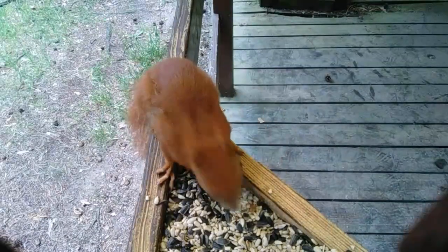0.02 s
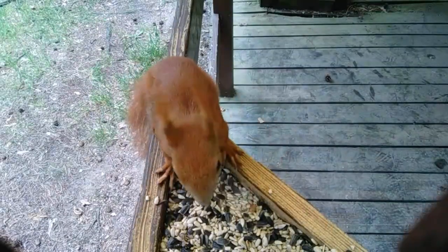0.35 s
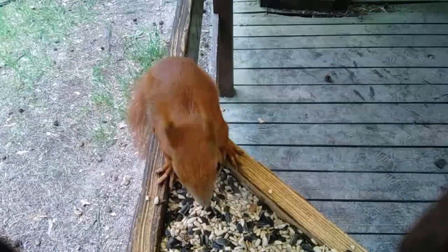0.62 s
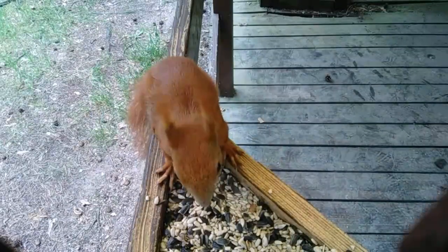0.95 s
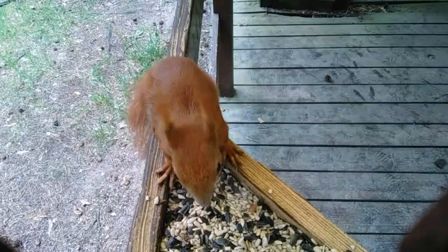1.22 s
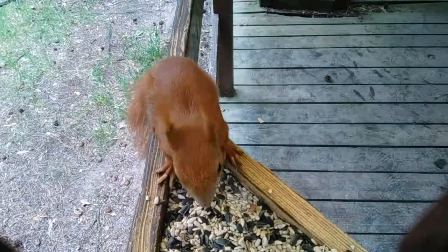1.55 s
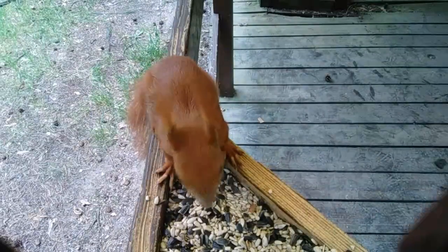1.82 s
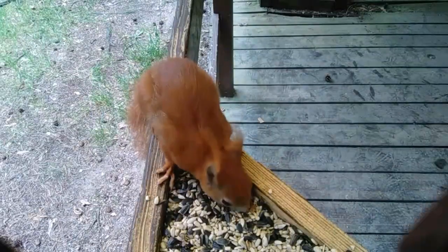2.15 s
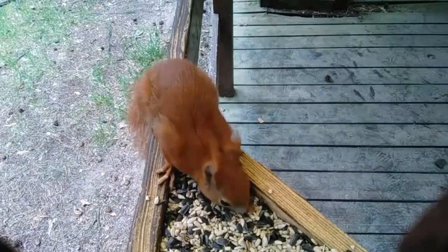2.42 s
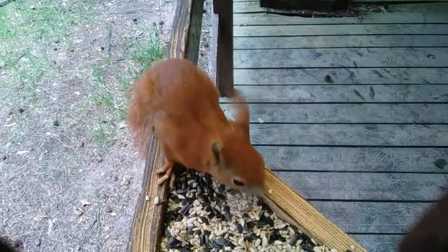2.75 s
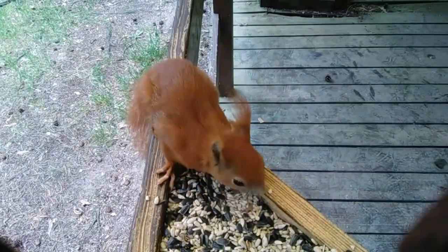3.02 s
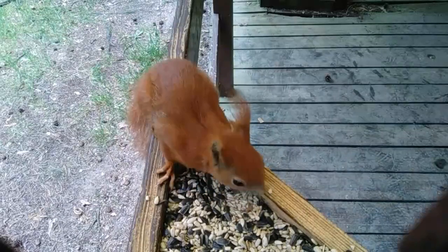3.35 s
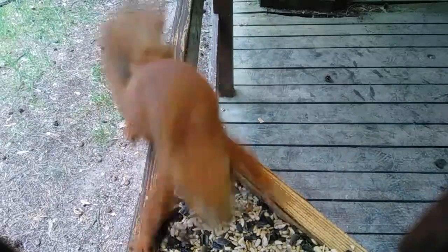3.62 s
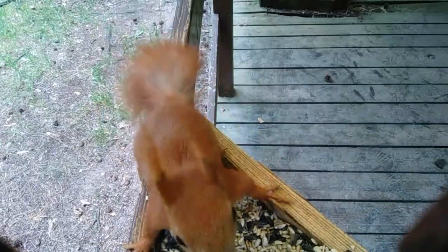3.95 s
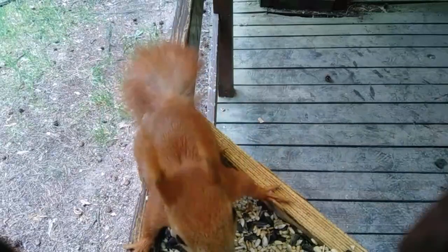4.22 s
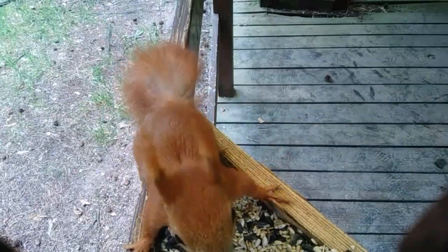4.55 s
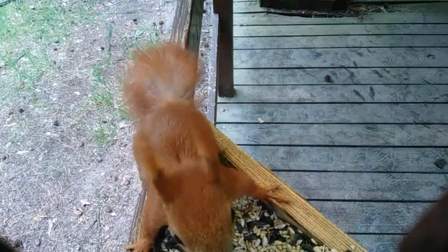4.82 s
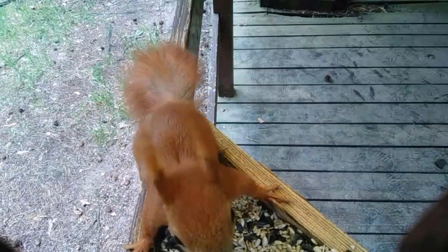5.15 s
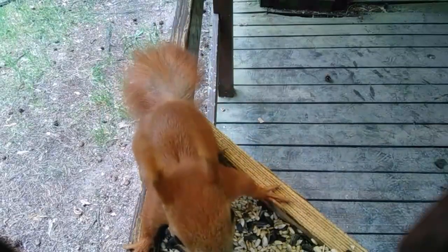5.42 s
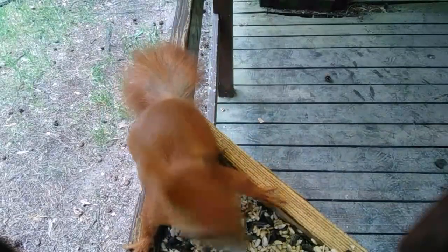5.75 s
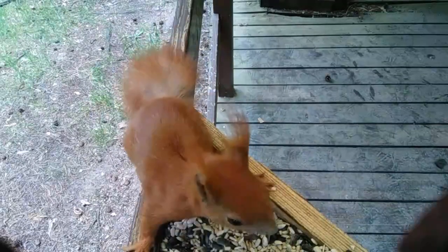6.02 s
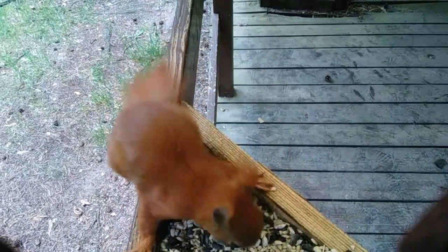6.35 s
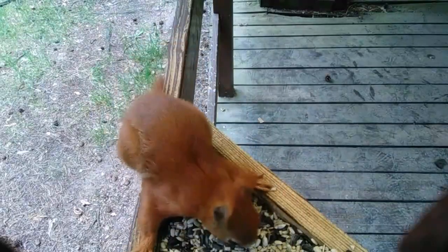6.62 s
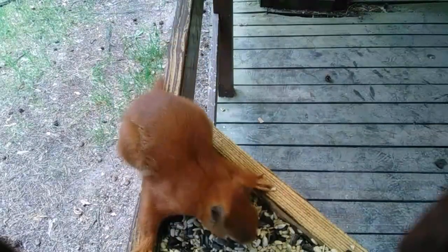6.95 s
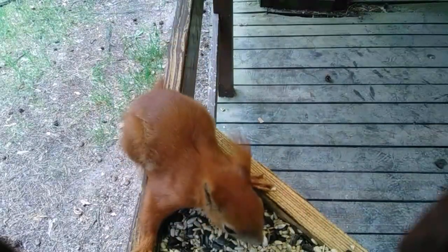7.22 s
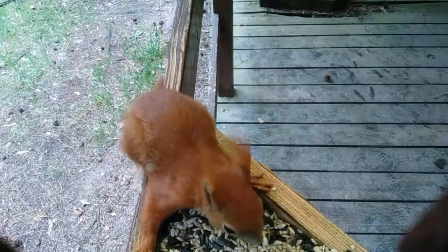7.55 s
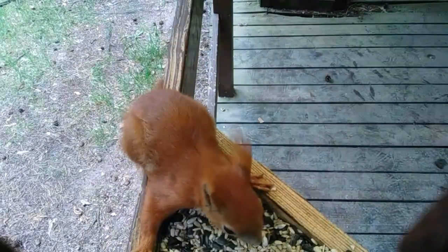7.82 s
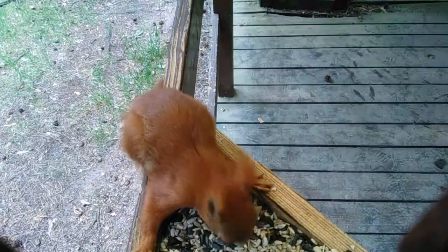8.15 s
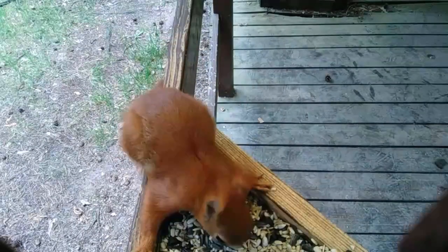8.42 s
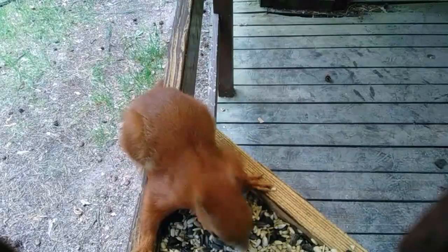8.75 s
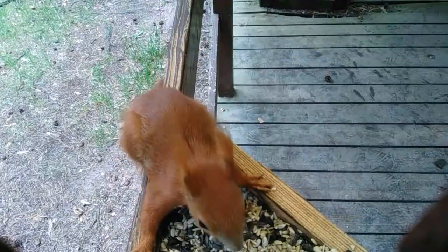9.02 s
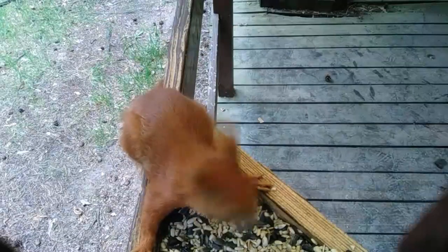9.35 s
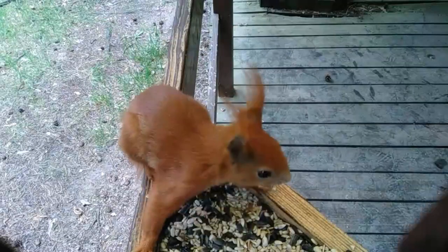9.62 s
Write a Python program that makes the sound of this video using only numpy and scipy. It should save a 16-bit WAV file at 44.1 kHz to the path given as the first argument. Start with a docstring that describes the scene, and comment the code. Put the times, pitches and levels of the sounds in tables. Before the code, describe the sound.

A squirrel feeds from a wooden seed tray on a porch, close to the microphone. Husks break with short, bright snaps, loose seeds tick and rustle, and paws knock on the boards. Two louder flurries of cracks, hollow thumps and shuffling come about a third of the way in and just past the middle. Lighter clicks and taps follow, over faint outdoor hiss and low rumble.

```python
"""Seed husks crack between a squirrel's teeth as it feeds from a wooden tray on a porch.
Each husk fails by brittle fracture: a run of tiny breaks gives a bright snap over a hollow body.
Paws knock and shuffle on the boards and excite their modes, while loose seeds tick and rustle.
The porch adds a short tail to cracks and knocks; faint outdoor air and a low rumble lie underneath.
The housing of a small camera close by colours most of these sounds with its resonances."""
import sys
import numpy as np
from scipy import signal
from scipy.fft import rfft, irfft
from scipy.io import wavfile
from scipy.ndimage import uniform_filter1d

SR = 44100
rng = np.random.default_rng(int(sys.argv[2]) if len(sys.argv) > 2 else 0)


def materialize(psi):
    """Save the field psi as 16-bit PCM at rate SR to the path in sys.argv[1].

    A 1-D psi becomes a single channel; in a 2-D psi each row is a channel.
    """
    bounded = np.clip(np.atleast_2d(psi).T, -1, 1)
    quanta = np.round(bounded * 32767).astype(np.int16)
    wavfile.write(sys.argv[1], SR, quanta)


N = 435708
TIME_S = np.arange(N) / SR
HIT_TIME_S = np.arange(SR // 2) / SR
FREQ_HZ = np.maximum(np.fft.rfftfreq(8192, 1 / SR), 1)
LEAD_S = 0.02  # room for the build-up ahead of each hit

# Resonances of the camera housing: centre_hz, width_hz, gain_db
HOUSING_PEAKS = [(372, 347, 7), (835, 217, 11.5), (1590, 200, 7), (2090, 56, 6), (2800, 32, 5.5),
                 (4040, 1100, 4.5), (5970, 2500, 2), (8250, 1900, 6.5), (9100, 61, 0)]
# Spectrum of the outdoor hiss: frequency_hz, gain_db
AIR_SPECTRUM = [(40, -4.5), (100, -3.5), (160, -12), (390, -7.5), (560, -14.5), (860, -11.5), (1050, -10.5),
                (1620, -9.5), (2300, -14), (3800, -17.5), (4900, -22), (8600, -16.5), (15500, -24.5)]
# Course of the outdoor air, before its trims: time_s, hiss_db, rumble_db
AIR_LEVELS = [(0.0, -60.5, -75), (1.35, -62.5, -69.5), (5.45, -65.5, -79.5), (5.89, -63, -69),
              (6.6, -66, -74), (9.88, -66.5, -81)]
# Nose and claws brushing through the seeds: start_s, level_db, centre_hz, length_s
SEED_BRUSHES = [(1.158, -65.5, 1620, 0.017), (1.262, -73.5, 2450, 0.14), (1.412, -62.5, 1550, 0.031),
                (1.587, -66, 730, 0.058), (1.752, -69, 2200, 0.088), (1.893, -66.5, 1730, 0.12),
                (2.043, -66.5, 495, .088), (3.058, -64, 820, 0.031), (3.121, -60.5, 920, 0.048),
                (4.802, -66, 1050, 0.026), (5.635, -65, 1510, 0.088), (5.769, -68, 1490, 0.16),
                (7.012, -72.5, 7100, .06), (7.098, -65, 1180, 0.033), (7.296, -73.5, 1620, 0.1),
                (7.653, -63.5, 1230, 0.086), (7.869, -70.5, 6840, 0.12), (8.059, -66, 1830, 0.051),
                (9.259, -71.5, 2080, 0.075), (9.412, -72, 1660, 0.036)]
# Modes of the tray's boards: pitch_hz, relative_db, t60_s
BOARD_MODES = [(114, 0, 0.24), (178.8, 8.5, 0.14), (256, -1.5, 0.075), (347, -19, 0.066), (414.7, 7, 0.092),
               (495, -29, 0.13), (618, -5, 0.16), (697, 3, 0.078), (800, -27, 0.072), (848, -2.5, 0.048),
               (1118, 9.5, 0.069), (1410, 2, .09), (1490, -6, 0.15)]
# Spectrum of soft paw contact: frequency_hz, gain_db
PAD_SPECTRUM = [(40, -105), (80, -26.5), (118, -2.5), (175, 2), (260, -2), (500, -15.5), (800, -18.5),
                (1500, -38), (3000, -39), (8000, -53)]
# Paws pushing on the rim as the weight shifts: start_s, level_db, hold_s
PAW_PUSHES = [(2.83, -48.5, 0.089), (2.98, -52.5, 0.011), (3.105, -54, 0.038), (3.629, -34.5, 0.011),
              (3.74, -60, .07), (4.11, -52.5, 0.034), (5.50, -60.5, 0.063), (5.58, -50, 0.064),
              (5.735, -45, 0.12), (5.99, -40.5, 0.037), (6.13, -56.5, 0.2)]
# The tray rocking under the animal: start_s, level_db, length_s
TRAY_SWAYS = [(2.894, -59, 0.081), (5.722, -45.5, 0.04), (5.808, -50.5, 0.13), (6.331, -50.5, .025),
              (7.593, -59, 0.07), (7.734, -60.5, 0.028)]
# Paws and seeds striking the tray: impact_s, level_db, pitch_hz, rattle_s
TRAY_KNOCKS = [(0.096, -61, 504, 0.016), (.793, -63.5, 348, 0.012), (0.987, -58.5, 430, 0.041),
               (1.2175, -33.5, 517, 0.00061), (1.386, -57, 686, .013), (1.438, -63, 440, .004),
               (1.782, -55.5, 390, 0.011), (1.87, -54.5, 393, 0.015), (2.284, -56.5, 360, 0.016),
               (2.4215, -35, 380, 0.0023), (2.851, -35.5, 207, 0.018), (3.217, -50, 253, 0.0067),
               (3.52, -38, 430, 0.019), (3.598, -32.5, 335, .013), (3.617, -31, 185, 0.014),
               (3.707, -44.5, 220, 0.01), (3.796, -46.5, 198, 0.0056), (3.886, -59.5, 640, 0.02),
               (3.978, -59.5, 530, .005), (4.106, -45.5, 221, 0.0086), (4.154, -46, 330, 0.0047),
               (4.416, -57, 380, 0.025), (5.088, -62, 292, 0.0033), (5.207, -60, 323, 0.02),
               (5.570, -39.5, 370, 0.032), (5.985, -35.5, 250, 0.025), (6.04, -43.5, 334, 0.019),
               (6.230, -35.5, 980, 0.011), (6.236, -27.5, 303, 0.015), (6.342, -45.5, 308, .001),
               (6.75, -58.5, 396, 0.0023), (7.633, -58.5, 476, .0056), (8.082, -57.5, 760, .025),
               (8.4437, -41.5, 370, 0.0089), (8.85, -59.5, 555, 0.0047), (9.075, -52.5, 398, 0.0058),
               (9.223, -49.5, 606, 0.016), (9.743, -65, 330, 0.015)]
# Spectrum of a hollow husk: frequency_hz, gain_db
HUSK_SPECTRUM = [(600, -27.5), (950, -10.5), (1200, -2), (1600, -3.5), (2200, -1), (3000, -4),
                 (4000, -17.5), (6000, -29.5), (12000, -39)]
# Resonances of the husk's cavity: centre_hz, width_hz, gain_db
CAVITY_PEAKS = [(1550, 1350, 5), (2400, 320, -1.5), (4330, 500, 7)]
# Husks breaking: split_s, snap_db, pitch_hz, body_db, tear_s
HUSK_CRACKS = [(0.4, -62.5, 6600, -62.5, 0.015), (1.218, -67, 7000, -56.5, .003),
               (1.287, -63.5, 11500, -72, .004), (1.369, -39, 8430, -53, 0.016),
               (1.65, -70, 7950, -75, 0.0011), (2.538, -48.5, 11600, -66, .0018),
               (2.546, -56, 10000, -57, 0.0087), (2.827, -66.5, 7560, -89, .005),
               (2.998, -67, 8760, -71, .005), (3.099, -65.5, 7350, -79, 0.0033),
               (3.191, -66.5, 9700, -81, .005), (3.512, -38, 8800, -55, 0.0052),
               (3.520, -32.5, 8100, -38, 0.004), (3.547, -45.5, 8450, -56, 0.0025),
               (3.570, -69, 8000, -53, .002), (3.588, -43.5, 8200, -50.5, 0.017),
               (3.710, -46.5, 9240, -66, 0.0037), (3.790, -58, 8840, -63, 0.005),
               (4.157, -41, 9040, -56.5, 0.013), (4.919, -47.5, 9200, -76, .005),
               (5.55, -60, 12000, -54, 0.0099), (5.577, -56, 8100, -61.5, 0.0091),
               (5.615, -56, 12500, -64.5, 0.0022), (5.9518, -32, 8000, -32, 0.024),
               (6.311, -57.5, 8430, -80, .004), (6.353, -60.5, 8250, -72, 0.004),
               (6.723, -74, 7000, -59, 0.0017), (7.108, -70, 9000, -72, 0.0032),
               (7.365, -66, 8700, -63, .001), (7.607, -62, 12100, -87, .002),
               (7.635, -56.5, 7500, -63, 0.0022), (8.486, -44.5, 10350, -77, .003),
               (8.852, -52.5, 7740, -61.5, 0.0012), (9.220, -50.5, 9400, -55, 0.0014)]


def amp(db):
    """Amplitude grows tenfold for every 20 dB."""
    return 10 ** (np.asarray(db) / 20)


def unit_rms(x):
    """Normalisation to unit mean power."""
    return x / np.sqrt(np.mean(x ** 2))


def at_level(x, db):
    """Energy normalisation: the hit has this level when its energy is spread over 20 ms."""
    return x * amp(db) / np.sqrt(np.sum(x ** 2) * 50 / SR)


def add(out, start_s, x):
    """Superposition: x joins the mix from start_s on."""
    start = max(int(start_s * SR), 0)
    out[start:start + len(x)] += x[:N - start]


def spectrum(points):
    """A spectral envelope, interpolated in decibels over log frequency."""
    hz, db = np.transpose(points)
    return amp(np.interp(np.log(FREQ_HZ), np.log(hz), db))


def band(hz, octaves):
    """A band-pass response with long skirts, symmetric in log frequency."""
    return (1 + (np.log2(FREQ_HZ / hz) / octaves) ** 2 / 2) ** -2


def resonances(peaks):
    """Resonances in series: their bell-shaped curves add in decibels."""
    return amp(sum(db / (1 + (2 * (FREQ_HZ - hz) / width_hz) ** 2) for hz, width_hz, db in peaks))


def colour(x, gain):
    """Minimum-phase filtering: folding the cepstrum makes the response causal."""
    cepstrum = irfft(np.log(np.maximum(gain, 1e-6)))
    cepstrum[1:len(FREQ_HZ) - 1] *= 2
    cepstrum[len(FREQ_HZ):] = 0
    response = irfft(np.exp(rfft(cepstrum)))
    return signal.fftconvolve(x, response)[:len(x)]


def decay(t60_s):
    """Exponential damping, 60 dB in t60_s."""
    return np.exp(-np.log(1000) * HIT_TIME_S / t60_s)


def strain(rise_s, fall_s, hold_s=0):
    """Strain grows exponentially up to the moment of a hit, holds and relaxes."""
    t = HIT_TIME_S - LEAD_S
    return np.exp(np.minimum(np.minimum(t / rise_s, (hold_s - t) / fall_s), 0))


def drift(rate_hz):
    """Slow random modulation with a spread near 1."""
    knots = rng.standard_normal(int(N / SR * rate_hz) + 2)
    return np.interp(TIME_S * rate_hz, np.arange(len(knots)), knots)


def grains(size, per_s, spread_db):
    """A Poisson train of tiny impacts of uneven strength and either sign."""
    occurs = rng.random(size) < per_s / SR
    strength = amp(spread_db * np.clip(rng.standard_normal(size), -2, 2))
    return occurs * rng.choice([-1, 1], size) * strength


def porch(x, wet_db, t60_s):
    """Diffuse reverberation: reflections from boards and wall form noise that trails the impacts."""
    tail = (decay(t60_s) * (1 - np.exp(-HIT_TIME_S / 0.001))) ** 2
    energy = np.abs(signal.fftconvolve(x ** 2, tail / tail.sum())[:len(x)])
    return x + amp(wet_db) * np.sqrt(energy) * rng.standard_normal(len(x))


def boards(force, ring_db):
    """Modal response: a contact is heard together with the damped modes that it excites."""
    ring = sum(amp(db) * np.cos(2 * np.pi * hz * HIT_TIME_S) * decay(t60_s)
               for hz, db, t60_s in BOARD_MODES)
    return force + amp(ring_db) * signal.fftconvolve(force, ring)[:len(force)]


def outdoor_air():
    """Ambient noise: a smooth distant hiss, and a narrow-band rumble that swells twice and dies down."""
    hiss_trim_db, rumble_trim_db = -2, 3
    time_s, hiss_db, rumble_db = np.transpose(AIR_LEVELS)
    hiss = unit_rms(colour(rng.standard_normal(N), spectrum(AIR_SPECTRUM) * resonances(HOUSING_PEAKS)))
    low_bands = band(hz=47.5, octaves=0.22) + amp(-20.5) * band(hz=27.3, octaves=0.27)
    rumble = unit_rms(colour(rng.standard_normal(N), low_bands))
    hiss_gain = amp(hiss_trim_db + np.interp(TIME_S, time_s, hiss_db) + 0.35 * drift(rate_hz=1.405))
    rumble_gain = amp(rumble_trim_db + np.interp(TIME_S, time_s, rumble_db))
    return hiss * hiss_gain + rumble * rumble_gain


def seeds():
    """Granular noise: brushed seeds slide in tiny collisions over constant faint nibbling and rustle."""
    out = np.zeros(N)
    for start_s, level_db, centre_hz, length_s in SEED_BRUSHES:
        size = int(length_s * SR)
        slide = colour(grains(size, per_s=2000, spread_db=2.5), band(centre_hz, octaves=0.54))
        add(out, start_s, amp(level_db) * unit_rms(slide * np.hanning(size)))
    bites = grains(N, per_s=16, spread_db=3.2)
    crumble_energy = signal.fftconvolve(bites ** 2, decay(t60_s=0.033) ** 2)[:N]
    nibbles = np.sqrt(np.abs(crumble_energy)) * rng.standard_normal(N)
    ticks = colour(nibbles, band(hz=9000, octaves=0.7) * resonances(HOUSING_PEAKS))
    rustle = colour(grains(N, per_s=900, spread_db=3), spectrum(HUSK_SPECTRUM))
    rustle *= amp(2.5 * drift(rate_hz=14))
    return out + amp(-79) * unit_rms(ticks) + amp(-78.5) * unit_rms(rustle)


def tray_rocking():
    """Low-frequency vibration: the tray sways under the animal in brief swells of deep noise."""
    out = np.zeros(N)
    for start_s, level_db, length_s in TRAY_SWAYS:
        size = int(length_s * SR)
        sway = colour(rng.standard_normal(size), band(hz=45, octaves=1.0))
        add(out, start_s, amp(level_db) * unit_rms(sway * np.hanning(size)))
    return out


def paw_shuffles():
    """Forced vibration: many soft pushes drive the boards as paws grip, hold and let go of the rim."""
    grip_s, release_s = 0.019, 0.045  # time constants
    pad_gain = spectrum(PAD_SPECTRUM) * resonances(HOUSING_PEAKS)
    pushes = colour(grains(N, per_s=500, spread_db=-0.5), pad_gain)
    rubbing = boards(pushes, ring_db=-47)
    # Even strength, so that the animal's weight sets the level.
    rubbing /= np.sqrt(uniform_filter1d(rubbing ** 2, size=1500) + 1e-18)
    out = np.zeros(N)
    for start_s, level_db, hold_s in PAW_PUSHES:
        grip = (TIME_S - start_s) / grip_s
        release = (start_s + hold_s - TIME_S) / release_s
        out += rubbing * amp(level_db) * np.exp(np.clip(np.minimum(grip, release), -20, 0))
    return out


def tray_knocks():
    """Impact excitation: harder contacts excite a wider band; claws and seeds rattle round each blow."""
    medium_db, medium_octaves, octaves_per_db = -45, 1.07, 0.1081
    out, housing = np.zeros(N), resonances(HOUSING_PEAKS)
    for impact_s, level_db, pitch_hz, rattle_s in TRAY_KNOCKS:
        edge_ratio = 2 ** ((medium_octaves + octaves_per_db * (level_db - medium_db)) / 2)
        highpass_hz, lowpass_hz = pitch_hz / edge_ratio, pitch_hz * edge_ratio
        contact = ((1 + (highpass_hz / FREQ_HZ) ** 7) * (1 + (FREQ_HZ / lowpass_hz) ** 12)) ** -0.5
        rattle = strain(rise_s=0.35 * rattle_s, fall_s=rattle_s)  # claws touch down ahead of the blow
        force = amp(-10) * grains(len(HIT_TIME_S), per_s=4000, spread_db=4) * rattle
        force[int(LEAD_S * SR)] = 1  # the blow
        force[int((LEAD_S + 0.003) * SR)] -= amp(-11.5)  # it returns inverted from the tray's far end
        push = colour(porch(force, wet_db=-9.5, t60_s=0.17), contact * housing)
        add(out, impact_s - LEAD_S, at_level(boards(push, ring_db=-52), level_db))
    return out


def husk_resonances(depth_db):
    """Irregular resonance: each husk has its own random peaks and dips."""
    knots_hz = np.linspace(0, SR / 2, num=170)
    return amp(depth_db * np.interp(FREQ_HZ, knots_hz, rng.standard_normal(len(knots_hz))))


def husk_cracks():
    """Brittle fracture: a run of tiny breaks gives a bright snap and excites the husk's hollow body."""
    clean_octaves, crush_octaves = 0.33, 0.47  # crushing the whole seed broadens the snap
    splinters = amp(-17) * band(hz=14700, octaves=0.091)  # the finest pieces fizz at the very top
    hollow = spectrum(HUSK_SPECTRUM) * resonances(CAVITY_PEAKS)
    out, housing = np.zeros(N), resonances(HOUSING_PEAKS)
    for split_s, snap_db, pitch_hz, body_db, tear_s in HUSK_CRACKS:
        body_share = amp(body_db) / (amp(body_db) + amp(snap_db))
        bright = band(pitch_hz, clean_octaves + crush_octaves * body_share) + splinters
        tearing = strain(rise_s=0.0013, fall_s=tear_s, hold_s=0.2 * tear_s)
        fractures = grains(len(HIT_TIME_S), per_s=9000, spread_db=6) * tearing
        timbre = husk_resonances(depth_db=2.5) * housing
        snap = colour(porch(fractures, wet_db=-2.5, t60_s=0.21), bright * timbre)
        body = colour(porch(fractures, wet_db=-1, t60_s=0.11), hollow * timbre)
        add(out, split_s - LEAD_S, at_level(snap, snap_db) + at_level(body, body_db))
    return out


def scene():
    """Superposition: all sources add at one microphone."""
    return (husk_cracks() + tray_knocks() + paw_shuffles() + tray_rocking() + seeds() + outdoor_air())[None]


def record(dry):
    """Band limiting: the camera's steep low-pass filter cuts the highest treble."""
    cutoff_hz = 15900
    return signal.sosfilt(signal.ellip(10, 0.2, 70, cutoff_hz, fs=SR, output="sos"), dry)


dry = scene()
out = record(dry)
materialize(out)
```